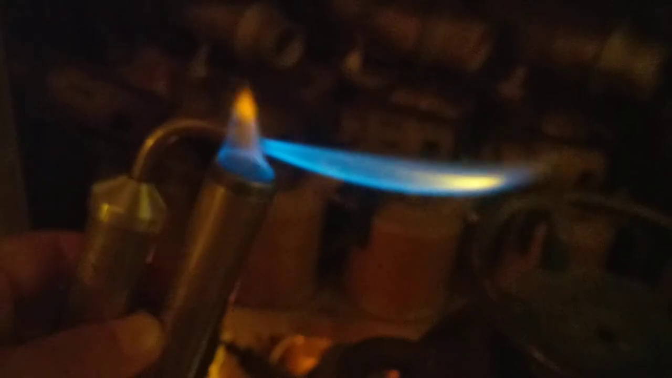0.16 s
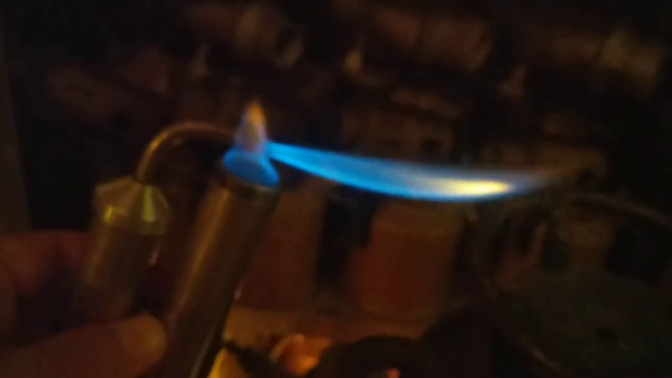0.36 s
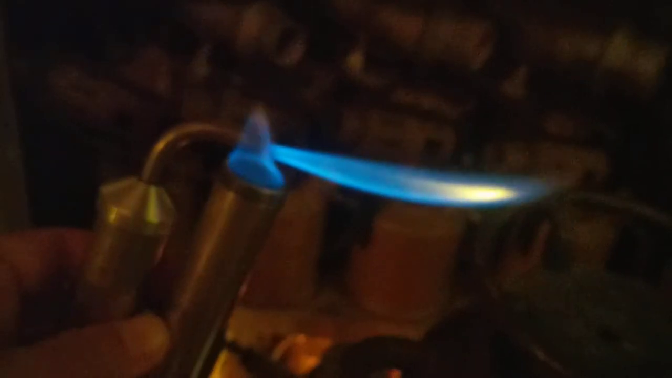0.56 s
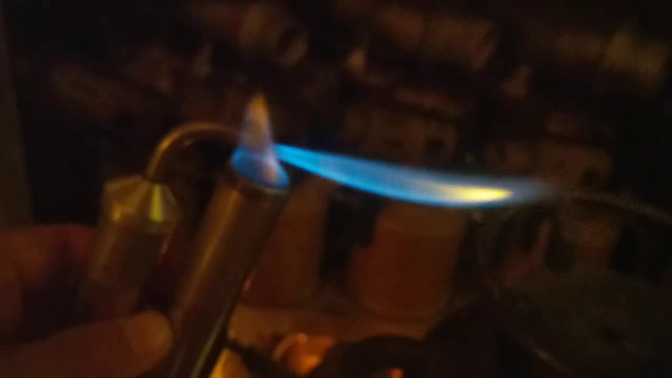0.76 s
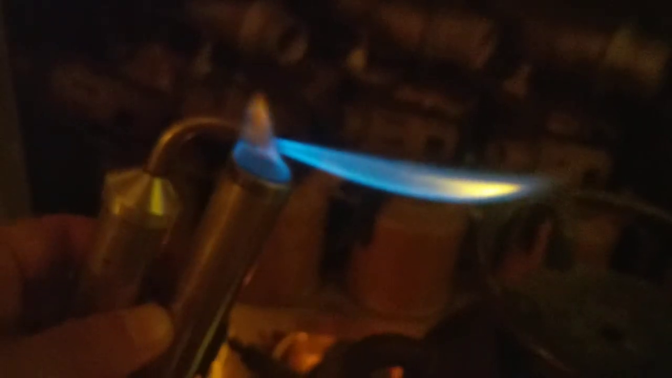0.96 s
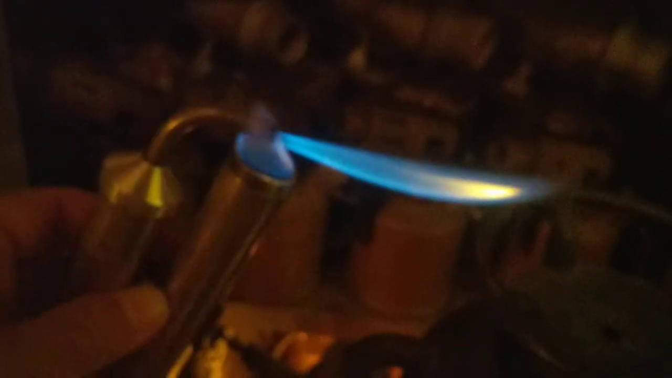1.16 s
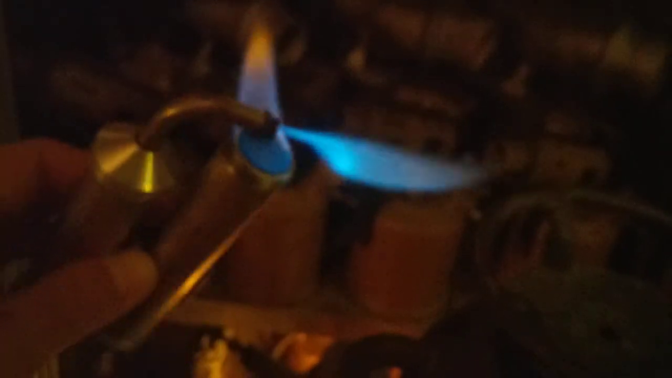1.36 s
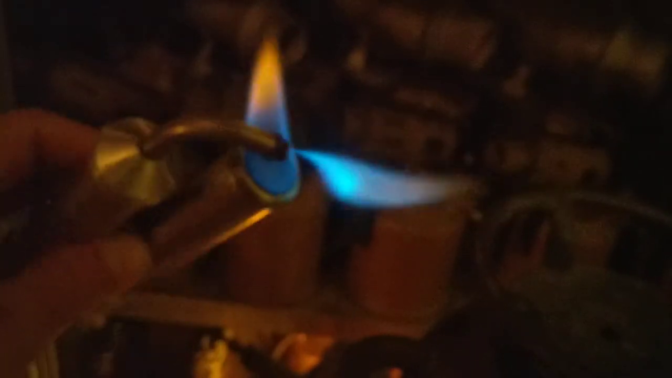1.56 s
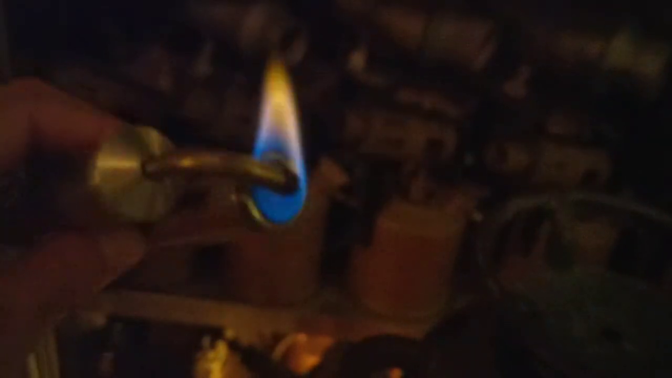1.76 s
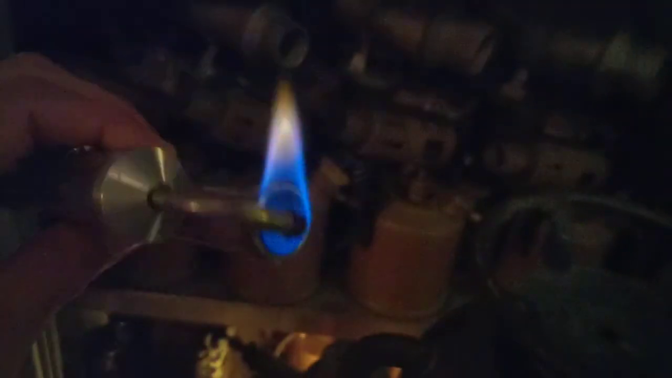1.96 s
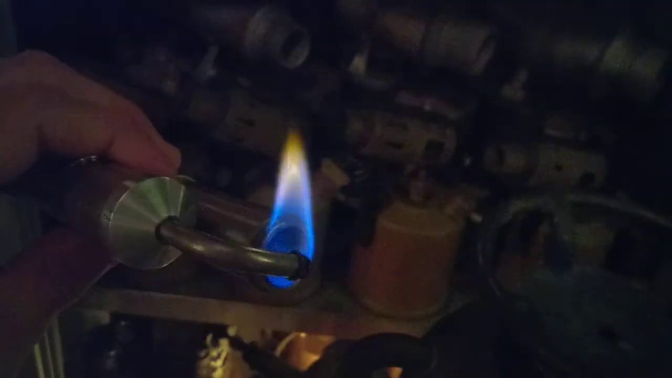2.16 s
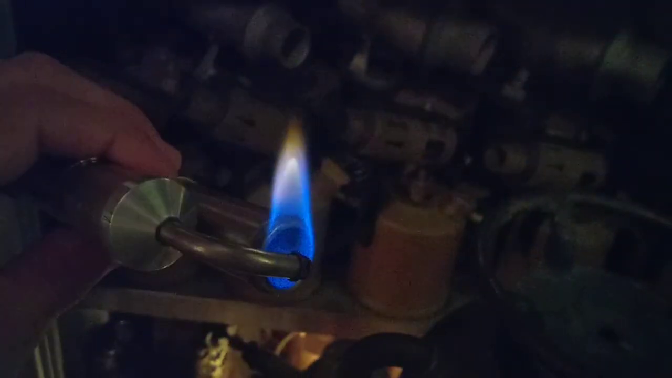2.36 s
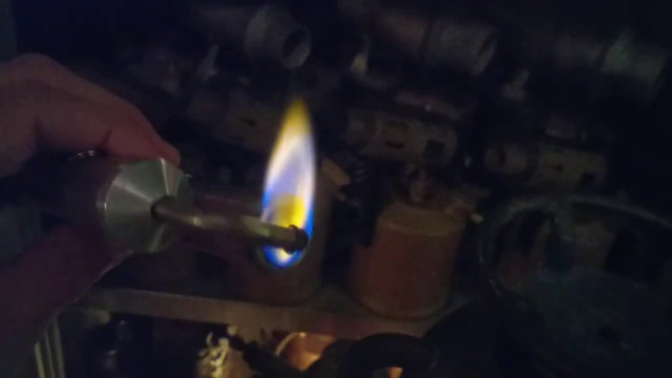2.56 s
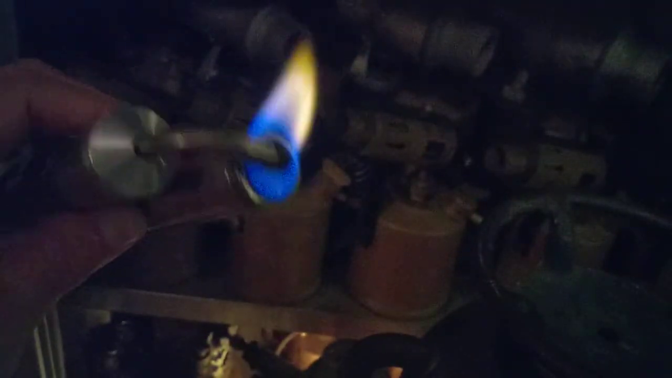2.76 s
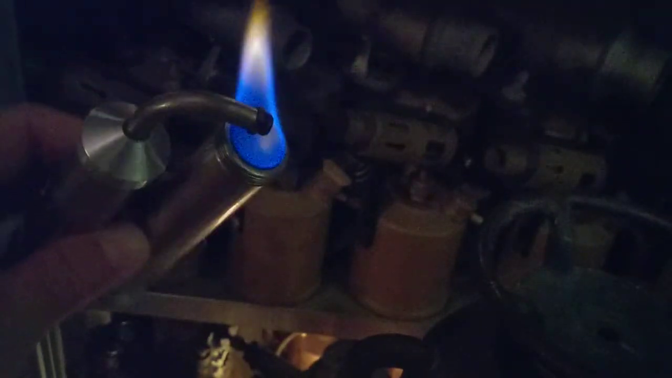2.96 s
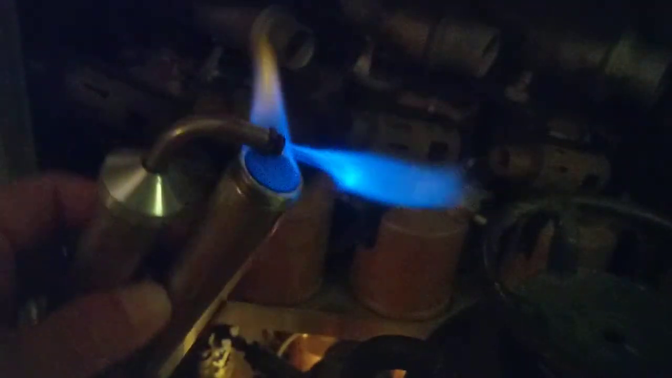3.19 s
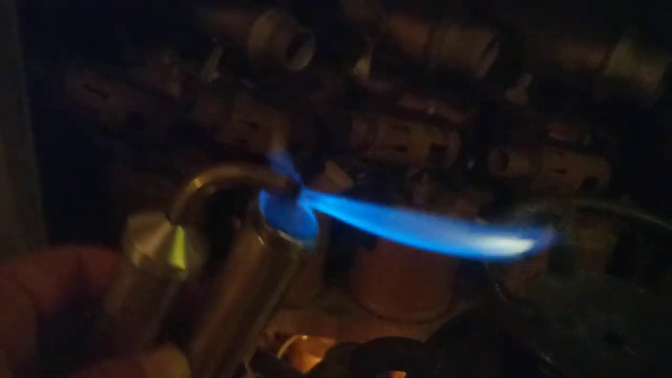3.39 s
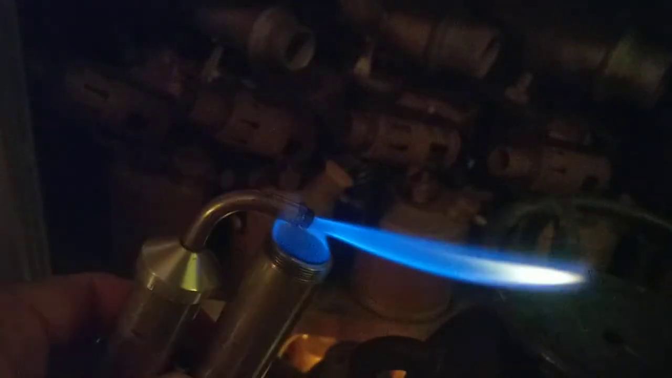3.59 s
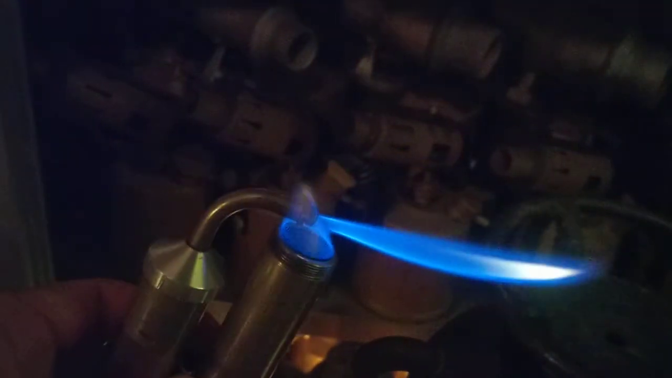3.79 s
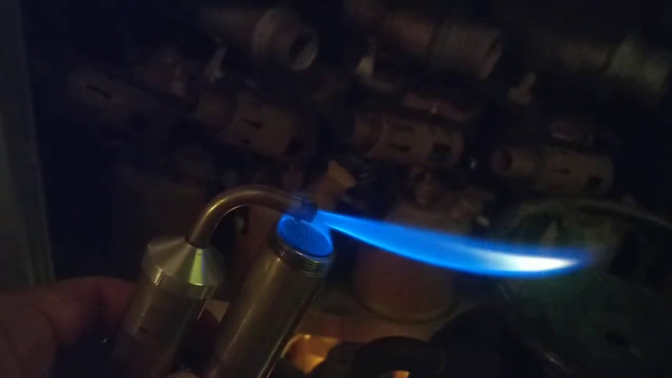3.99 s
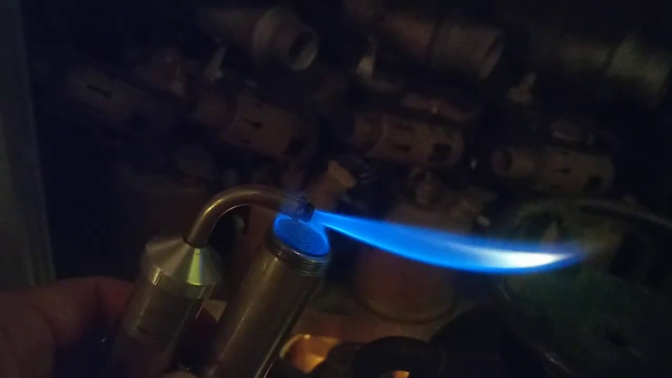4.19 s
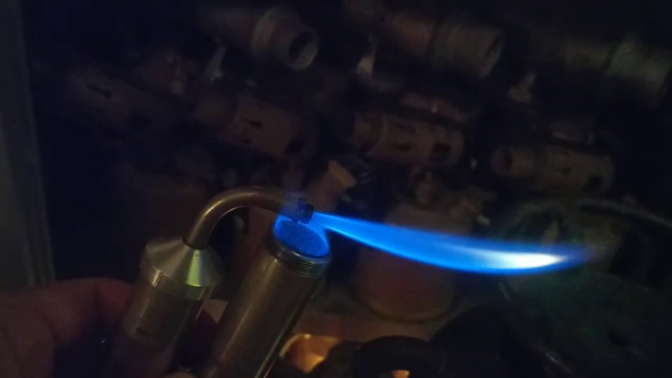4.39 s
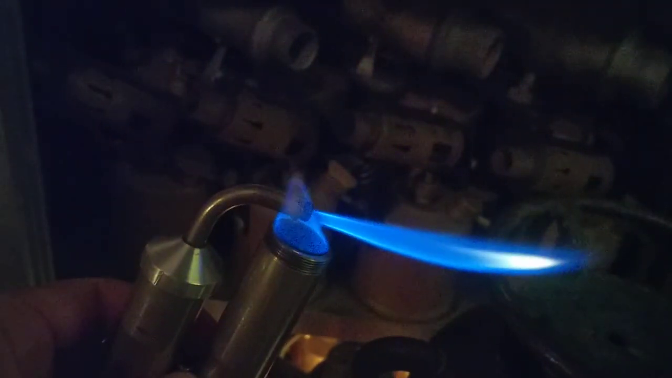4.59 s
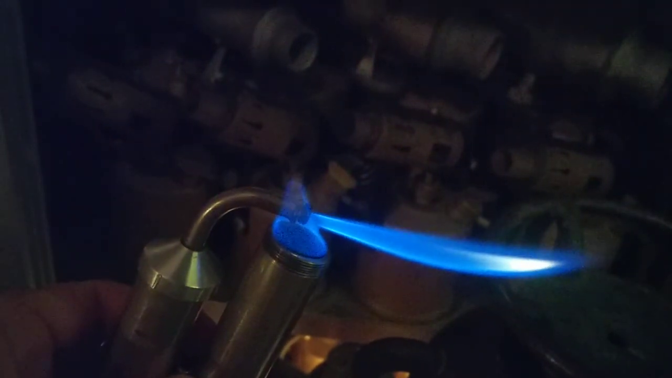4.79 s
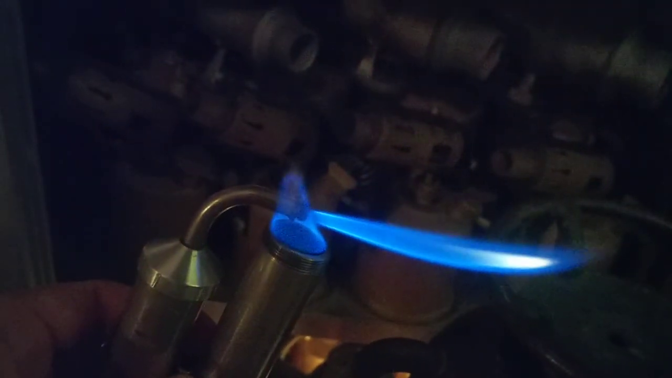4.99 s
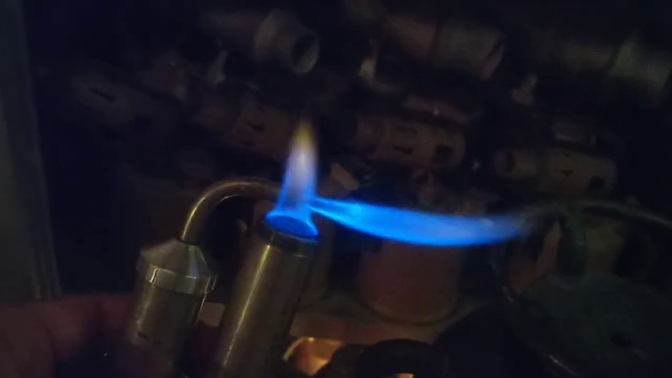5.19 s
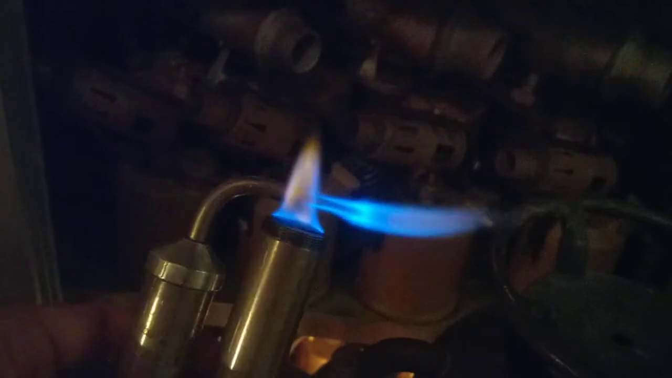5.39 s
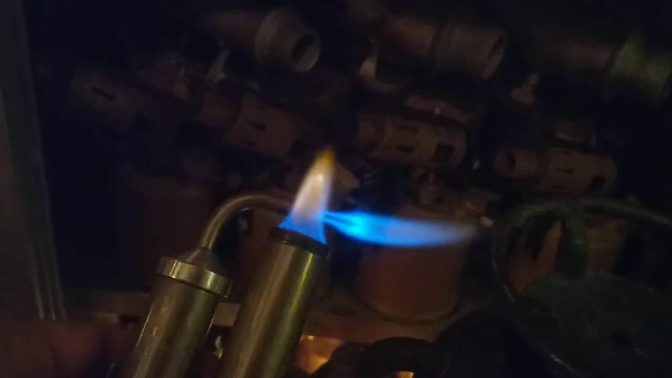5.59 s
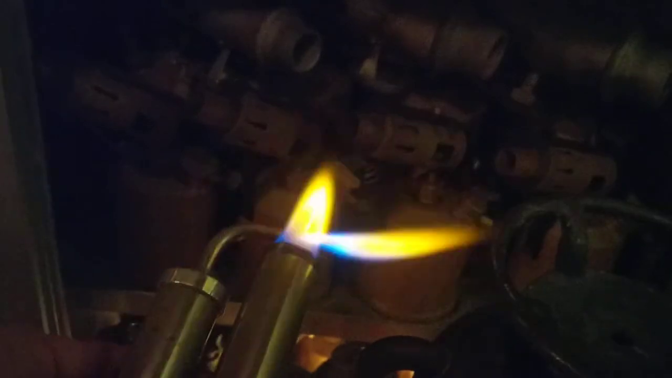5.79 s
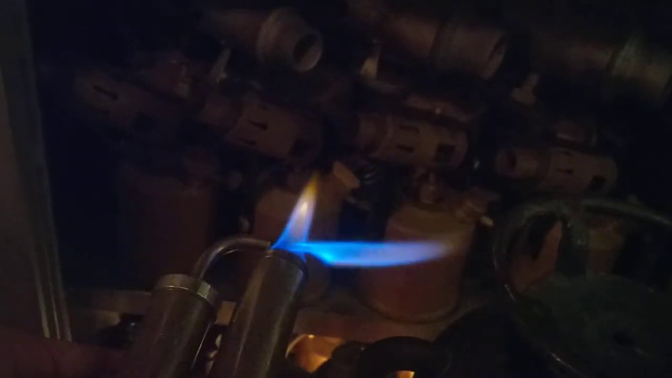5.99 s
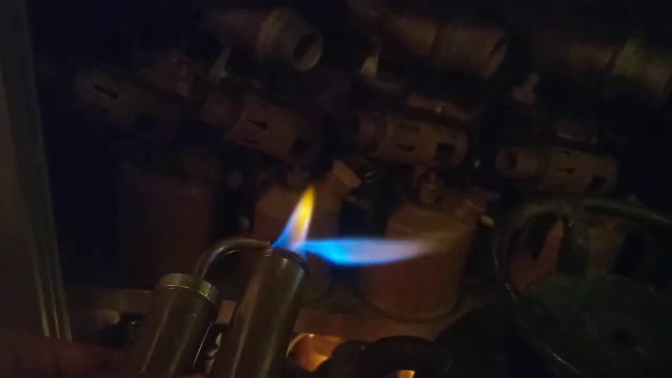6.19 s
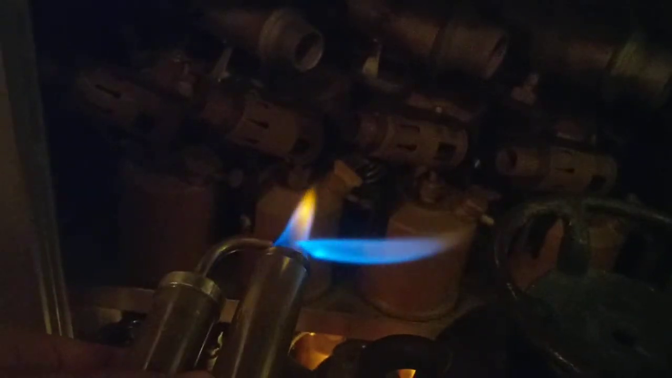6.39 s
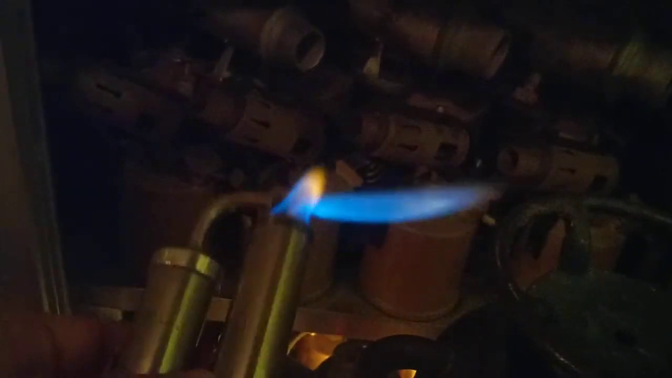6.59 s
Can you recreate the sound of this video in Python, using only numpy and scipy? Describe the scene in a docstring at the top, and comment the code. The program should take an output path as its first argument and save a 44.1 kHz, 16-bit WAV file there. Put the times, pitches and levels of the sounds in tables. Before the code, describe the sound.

A hand-held burner near the microphone in a quiet, cluttered room: thin vapour hiss over a smooth flame, a short ragged rush, abrupt drop to weak hiss, then a dull whump and sputter as it catches again. Steady hissing follows, before a brief burst and a longer turbulent, crackling roar that weakens at the end. Short, close reflections.

```python
"""Spirit blow lamp in a quiet workshop

A hand-held lamp close to a camera: filtered noise makes the vapour's hiss and the smooth jet flame it feeds.
A few times the jet lifts off and roars, as random pressure pulses over turbulent noise; once it goes out and
relights with a pop, a decaying low tone under strong pulses. Small dry ticks, near echoes and room tone surround it.
The lamp is nearer the left microphone port, so the right one hears it a little late."""
import sys
import numpy as np
from scipy import signal
from scipy.fft import rfft, irfft, next_fast_len
from scipy.io import wavfile
from scipy.ndimage import uniform_filter1d, map_coordinates

SR = 44100
rng = np.random.default_rng(int(sys.argv[2]) if len(sys.argv) > 2 else 0)


def unload_wav(signal):
    """Save mono or channel-first audio to the path in sys.argv[1] as 16-bit WAV at rate SR, clipped to [-1, 1]."""
    wavfile.write(
        sys.argv[1],
        SR,
        np.round(np.clip(np.atleast_2d(signal).T, -1, 1) * 32767).astype(np.int16),
    )


N = 293247

# colour of spitting droplets, for single ticks and crackle: hz, relative_level_db
SPIT_COLOUR = [(600, -24), (1500, -12), (3000, 0), (4500, 2), (8000, 0), (11000, 5), (14500, 8),
               (16000, -20)]


def amp(db):
    """Amplitude factor of a level in dB."""
    return 10 ** (np.asarray(db) / 20)


def unit(x):
    """x scaled to an rms of one."""
    return x / np.sqrt(np.mean(x ** 2) + 1e-20)


def along(points, hz, axis=1):
    """One column of a frequency table, read on a log axis."""
    table = np.transpose(points)
    return np.interp(np.log(hz + 1), np.log(table[0] + 1), table[axis])


def curve(rows, outside=None):
    """One value per sample from (start_s, value) rows."""
    s, v = np.transpose(rows)
    return np.interp(np.arange(N) / SR, s, v, left=outside, right=outside)


def wobble(rate):
    """A smooth random curve, rate knots a second."""
    knots = rng.standard_normal(int(N * rate / SR) + 4)
    return map_coordinates(knots, [np.arange(N) * rate / SR])


def coloured(x, points, axis=1):
    """x through a (hz, level_db) table, without phase shift."""
    m = next_fast_len(N + 8192)
    gain = amp(along(points, np.fft.rfftfreq(m, 1 / SR), axis=axis))
    return irfft(rfft(x, m) * gain, m)[:N]


def causal(x, points, axis=1):
    """x through a (hz, level_db) table with minimum phase, so nothing sounds before its cause."""
    m = 2 * next_fast_len(N // 2 + 4096)
    gain = amp(along(points, np.fft.rfftfreq(m, 1 / SR), axis=axis))
    # folding the cepstrum forward in time gives the minimum phase
    cepstrum = irfft(np.log(gain), m)
    cepstrum[1:m // 2] *= 2
    cepstrum[m // 2 + 1:] = 0
    return irfft(rfft(x, m) * np.exp(rfft(cepstrum)), m)[:N]


def peaked(hz, centre_hz, width_hz, db):
    """A resonator's causal bump (or dip) of db at the centre."""
    ring = 1j * hz * width_hz / (centre_hz ** 2 - hz ** 2 + 1j * hz * width_hz)
    return 1 + (amp(db) - 1) * ring


def patchy(depth_db):
    """White noise with patches of random gain in time and frequency."""
    z = signal.stft(rng.standard_normal(N), nperseg=256)[2]
    field = uniform_filter1d(rng.standard_normal(z.shape), size=5, axis=0)
    field = uniform_filter1d(field, size=20, axis=1)
    return signal.istft(z * amp(depth_db * unit(field)), nperseg=256)[1][:N]


def struck(events, spectrum, colour):
    """One pressure pulse of the given colour per (start_s, peak_db) row."""
    blows = np.zeros(N)
    for s, db in events:
        blows[round(s * SR)] = amp(db)
    single = colour(np.arange(N) == 0, spectrum)
    return colour(blows, spectrum) / np.abs(single).max()


def workshop():
    """Low room tone; the bass is partly common to the two ports, the treble unrelated."""
    # room tone colour: hz, relative_level_db
    tone_colour = [(20, -23), (40, -6.5), (70, 1), (120, -6), (220, -6), (400, -12), (800, -18.5),
                   (1500, -21.5), (2500, -24), (4000, -30), (7000, -19.5), (14000, -5.5)]
    # the part both ports share, against the rest: hz, level_db
    shared_part = [(60, -2.5), (200, -6), (500, -11.5), (2000, -13.5)]
    left, right, both = (unit(coloured(patchy(depth_db=2.5), tone_colour)) for _ in range(3))
    return amp(-42.5) * (np.array([left, right]) + coloured(both, shared_part))


def reflections(x):
    """Diffuse answer of the far walls: the power of x dies away by band, with unrelated phases at each port."""
    # far walls: hz, level_db, t60_s
    walls = [(100, -58, 0.26), (590, -17, 0.26), (1750, -8, 0.036), (4000, -9.5, 0.036), (5000, -4.5, 0.11),
             (5900, -0.5, .09), (6940, 1.5, 0.12), (9400, 4.5, 0.09)]
    hz, t, z = signal.stft(x, SR, nperseg=256)
    decay = amp(-120 * t[:80] / along(walls, hz, axis=2)[:, None])  # power: 60 dB down at t60
    decay = decay / decay.sum(1, keepdims=True) * amp(2 * along(walls, hz))[:, None]
    power = np.abs(signal.fftconvolve(np.abs(z) ** 2, decay, axes=1)[:, :len(t)])
    scatter = signal.stft(rng.standard_normal((2, N)), SR, nperseg=256)[2]
    scatter = scatter / np.sqrt(np.mean(np.abs(scatter) ** 2))
    return signal.istft(np.sqrt(power) * scatter, SR, nperseg=256)[1][:, :N]


def clutter(x):
    """Dense early echoes off things on the bench; their pattern keeps changing as the hand moves the lamp."""
    # things close by on the bench: hz, echo_level_db
    bench_echo = [(150, -38), (300, -25), (600, -14.5), (1200, -10), (2500, -8.5), (3700, -4), (4400, -8),
                  (5000, -3.5), (6000, -7), (7300, -5), (10000, 0)]
    hop = 8192  # samples between two echo patterns
    first_echo_s, t60_s = .0009, 0.068
    x = np.pad(coloured(x, bench_echo), (hop, 2 * hop))
    t = np.arange(SR // 20) / SR
    echoes = np.zeros((2, len(x) + len(t)))
    fade = np.sin(np.pi * np.arange(2 * hop) / (2 * hop))
    for start in range(0, N + hop, hop):
        tail = rng.standard_normal((2, len(t))) * amp(-60 * t / t60_s) * (t > first_echo_s)
        tail = tail / np.linalg.norm(tail[0])
        part = signal.fftconvolve(fade * x[None, start:start + 2 * hop], tail, axes=1)
        echoes[:, start:start + part.shape[1]] += part
    return echoes[:, hop:hop + N]


def ticks():
    """Small dry ticks, probably droplets spitting: one causal pulse each."""
    # single ticks at the lamp: start_s, peak_db
    tick_times = [(2.036, -19), (2.493, -40), (2.548, -41), (5.44, -32), (5.908, -23), (6.133, -28),
                  (6.472, -31)]
    return struck(tick_times, SPIT_COLOUR, causal)


def lifted():
    """Amplitude of the turbulent flame over time."""
    # lifted flame, one list per rush: start_s, roar_db
    rushes = [
        [(1.268, -60), (1.295, -39), (1.36, -33), (1.6, -29.5), (1.63, -30), (1.68, -87)],
        [(3.077, -34.5), (3.16, -39.5), (3.21, -35.5), (3.24, -34.5), (3.27, -38.5), (3.31, -34.5),
         (3.34, -40.5), (3.44, -54.5), (3.56, -56)],
        [(5.165, -54), (5.195, -32.5), (5.225, -36), (5.26, -49), (5.275, -49)],
        [(5.275, -51), (5.305, -44.5), (5.325, -36), (5.46, -32), (5.6, -33), (5.84, -31.5), (5.9, -35),
         (6.06, -38.5), (6.12, -38.5), (6.135, -34.5), (6.21, -33.5), (6.27, -36.5), (6.45, -40.5),
         (6.475, -38.5), (6.51, -39), (6.55, -45.5), (6.65, -49)],
    ]
    return np.max([amp(curve(rush, outside=-120)) for rush in rushes], axis=0)


def crackle():
    """Droplets spit at random while the flame is lifted, as pulses of random size."""
    level_db, spits_per_s = -27, 70  # level is against the roar
    sizes = amp(3 * rng.standard_exponential(N).clip(0, 2))
    spits = (rng.random(N) < spits_per_s / SR) * sizes
    return amp(level_db) * lifted() * unit(causal(spits, SPIT_COLOUR))


def nozzle(sputter_db):
    """Vapour hiss, uneven as the boiler pressure wavers, stronger and sputtering while the flame is lifted."""
    # vapour leaving the nozzle: start_s, hiss_db
    vapour = [(0, -45.5), (1.6, -46), (1.66, -51), (1.9, -58.5), (2.4, -57.5), (2.76, -56), (2.85, -58.5),
              (2.9, -53), (3.06, -53), (3.1, -48), (3.8, -48.5), (4.3, -48), (5.1, -50.5), (5.8, -49),
              (6.1, -52.5), (6.15, -50.5), (6.65, -59.5)]
    # hiss colour: hz, relative_level_db
    hiss_colour = [(500, -41), (1500, -3.5), (3000, 3.5), (4500, 3), (6000, -2), (10000, -2.5), (14000, 0)]
    tear_db, surge_db = -27.5, 3  # extra hiss of a lifted flame against its roar; its random surging
    sputter_ratio = 3.7  # sputter in the extra hiss, against that in the roar
    tear = amp(tear_db + surge_db * wobble(12) + sputter_ratio * sputter_db) * lifted()
    level = amp(curve(vapour)) + tear
    pressure = amp(0.41 * wobble(23.26) + 0.58 * wobble(6))
    return level * pressure * unit(coloured(patchy(depth_db=1.3), hiss_colour))


def jet():
    """The attached flame burns as soft, slightly unsteady noise."""
    # smooth jet flame while lit: start_s, burn_db
    burn = [(0, -49), (1.3, -52), (3.6, -55), (6.65, -53)]
    # flame colour: hz, relative_level_db
    flame_colour = [(40, -27), (110, 2.5), (300, -2), (550, 2.5), (900, -5), (2000, -6.5), (5000, -27.5)]
    out_s, back_s, snuff_s = 1.64, 3.07, 0.012  # blown out, relit, duration of each change
    pilot_db = -67.5  # what is left while the jet is out
    lit = curve([(out_s - snuff_s, 1), (out_s, 0), (back_s, 0), (back_s + snuff_s, 1)])
    level_db = lit * curve(burn) + (1 - lit) * pilot_db
    return amp(level_db + 0.076 * wobble(4.9)) * unit(coloured(patchy(depth_db=0.43), flame_colour))


def relight():
    """The cloud of unburnt vapour expands at once: one deep push, a decaying low sine."""
    # the jet relights: start_s, initial_level_db, pitch_hz, t60_s
    whump = [(3.081, -29.5, 90, .13)]
    push = np.zeros(N)
    for s, db, hz, t60 in whump:
        t = (np.arange(N) / SR - s).clip(0)
        push += amp(db - 60 * t / t60) * np.sin(2 * np.pi * hz * t)
    return push


def roar(sputter_db):
    """Pockets of vapour ignite at random, each a brief pressure pulse, over turbulent noise."""
    # strong gulps of vapour catching fire: start_s, peak_db
    pops = [(1.5119, -16), (3.0793, -20), (3.095, -24), (3.109, -25), (3.2376, -23), (5.195, -26),
            (5.2063, -22), (5.3218, -23), (5.334, -22), (5.6992, -18), (5.762, -20), (5.802, -19),
            (5.8113, -21), (5.828, -22), (5.8642, -17), (6.2252, -19), (6.498, -29)]
    # colour of a strong gulp: hz, relative_level_db
    pop_colour = [(30, -40), (90, -14), (250, -4), (450, 0), (650, -3), (1000, -14), (2500, -24),
                  (6000, -42)]
    # colour of the small random gulps: hz, relative_level_db
    gulp_colour = [(30, -40), (70, -13), (200, -3), (450, 0), (700, -4), (1200, -12), (3000, -20),
                   (6000, -34)]
    # colour of the turbulence: hz, relative_level_db
    roar_colour = [(25, -62), (60, -1.5), (110, -4), (220, 2.5), (400, 3.5), (540, 5), (680, -2.5),
                   (900, -8), (1070, -5), (1400, -10), (2000, -8), (3000, -12), (4000, -17), (5500, -18),
                   (9000, -34)]
    lull_share, lull_s = .6, .003  # the roar gives way around a strong gulp: share, half width
    fires = rng.random(N) < 450 / SR
    sizes = amp(2.7 * rng.standard_exponential(N).clip(0, 1.9))
    gulps = -unit(coloured(fires * sizes, gulp_colour))
    turbulence = unit(coloured(patchy(depth_db=2.1), roar_colour))
    t = np.arange(N) / SR
    lull = np.prod([1 - lull_share * np.exp(-((t - s) / lull_s) ** 2) for s, _ in pops], axis=0)
    rough = unit(amp(sputter_db) * (0.73 * gulps + 0.67 * turbulence))
    return lifted() * lull * rough - struck(pops, pop_colour, coloured)


def arrive(x, diffuse):
    """Direct sound takes lag, dips and bright bands from the lamp's position; the camera body colours everything."""
    # lamp position: start_s, right_lag_ms, body_resonance_db, upper_band_db, lower_band_db,
    # shade_db (direct low and middle tones while the lamp is turned away), left_dip_hz
    turn = [(0, 0.14, 8, -6, -2, -1.5, 1930), (1.25, 0.13, 6.5, 8, 2, -1, 1910),
            (1.6, 0.11, 4.8, 10, 5, -0.5, 1900), (1.75, 0.15, 6.4, 3, 3.5, -2, 1800),
            (3.03, 0.14, 6.2, 3, 3, -6, 1800), (3.07, 0.12, 5.1, 7, 1, 1, 1860),
            (3.6, 0.12, 5.3, 10, 6, 0.5, 1900), (4.3, 0.13, 3.3, 11.5, 3.5, -1.5, 1890),
            (4.7, 0.14, 8.6, 6, 5, -1.5, 1930), (5.1, 0.12, 6.5, 0, 4, 0, 1950),
            (5.6, 0.076, 4.8, 10.5, -4, -2, 2130), (6, 0.099, 5, 9, -2, 0, 2280),
            (6.5, 0.099, 4.5, -8, -3, -2, 2230)]
    # upper, then lower bright band of the direct sound: centre_hz, width_hz, right_share (of its dB)
    beams = [(8000, 460, .05), (7200, 260, 2.3)]
    hz, t, z = signal.stft(x, SR, nperseg=512)
    hz = hz[:, None]
    s, *cols = np.transpose(turn)
    lag_ms, body_db, upper_db, lower_db, shade_db, dip_hz = (np.interp(t, s, c) for c in cols)

    # the body resonance rises as the lag shrinks; the right port gets a small share of its dB
    body_hz = 2470 - 3000 * (lag_ms - 0.13)
    body = np.array([peaked(hz, body_hz, 295, share * body_db) for share in (1, 0.18)])

    z = z * amp(shade_db / (1 + (hz / 3000) ** 4))  # shading acts below 3000 Hz
    half_lag = np.exp(1j * np.pi * hz * lag_ms / 1000)  # left early by half the lag, right late
    # each port has a dip where the direct sound cancels against its path round the camera
    left = z * half_lag * peaked(hz, dip_hz, width_hz=290, db=-15.5)
    right = z / half_lag * peaked(hz, 5180, width_hz=380, db=-8)
    for db, (centre, width, share) in zip((upper_db, lower_db), beams):
        band_db = db * np.exp(-((hz - centre) / width) ** 2)
        left, right = left * amp(band_db), right * amp(share * band_db)
    pair = np.array([left, right]) + signal.stft(diffuse, SR, nperseg=512)[2]
    return signal.istft(body * pair, SR, nperseg=512)[1][:, :N]


def scene():
    """The lamp, its ticks and their echoes over the room tone, as they reach the two ports."""
    sputter_db = 1 * wobble(60)  # fast unevenness of the lifted flame: scale in dB, knots a second
    lamp = roar(sputter_db) + relight() + jet() + nozzle(sputter_db)
    spitting = ticks() + crackle()
    echoed = lamp + amp(-9) * spitting  # the spitting has little echo
    return arrive(lamp + spitting, clutter(echoed) + reflections(echoed) + workshop())


def record(dry):
    """Each microphone port has its own resonances and notch; nothing is kept above the band limit."""
    # microphone ports: hz, left_db, right_db
    ports = [(820, 0, 0.5), (1090, -1, 1), (1355, -3.5, -4), (1610, -4, -3), (2170, -4.5, -3.5),
             (2340, 1, 1), (2900, 0, 1), (3490, -3.5, -2), (4360, -2, -3), (4500, -1.5, -5),
             (5050, -1, -11), (5570, -0.5, -5.5), (6330, 3, -1.5), (7940, 1.5, -5), (10150, -3.5, -9.5),
             (10940, -12.5, -16), (13300, -22.5, -22.5)]
    top_hz = 14350
    wet = np.array([causal(dry[0], ports, axis=1), causal(dry[1], ports, axis=2)])
    m = next_fast_len(N + 4096)
    return irfft(rfft(wet, m) * (np.fft.rfftfreq(m, 1 / SR) < top_hz), m)[:, :N]


dry = scene()
out = record(dry)
unload_wav(out)
```